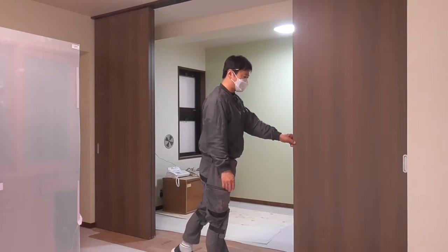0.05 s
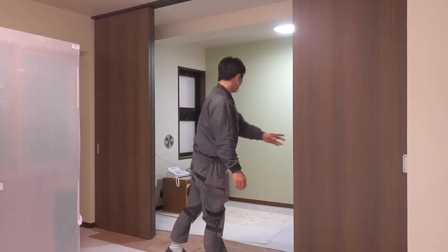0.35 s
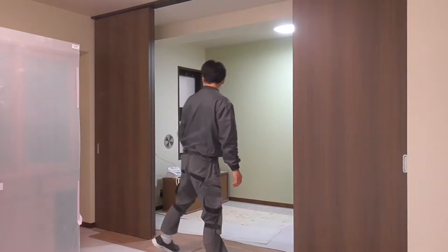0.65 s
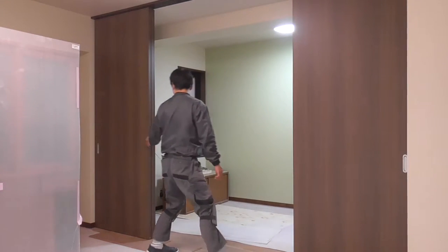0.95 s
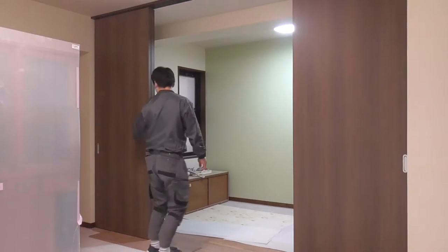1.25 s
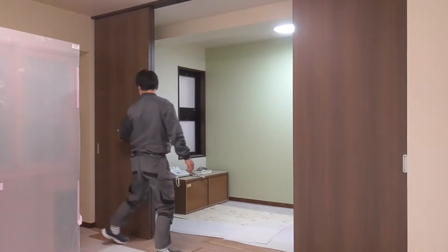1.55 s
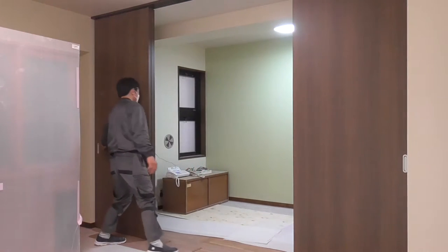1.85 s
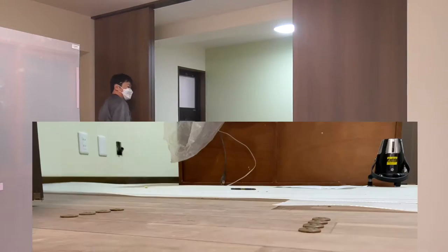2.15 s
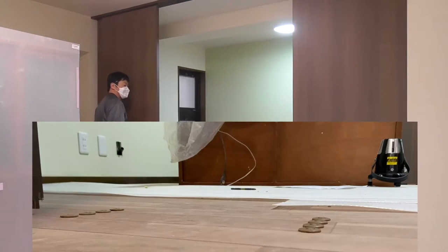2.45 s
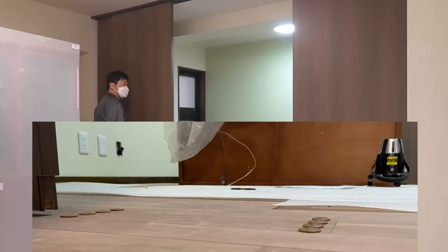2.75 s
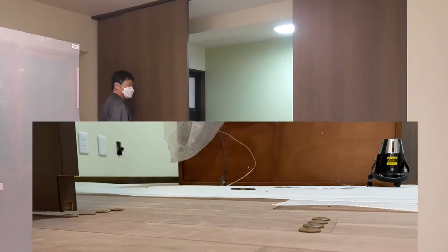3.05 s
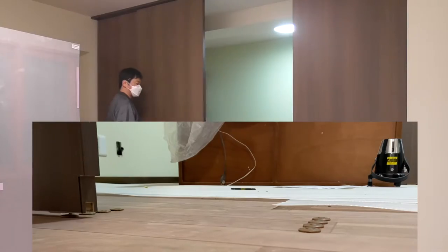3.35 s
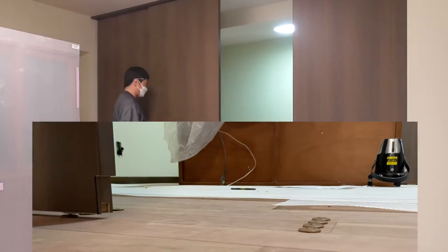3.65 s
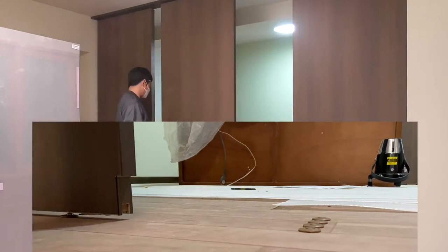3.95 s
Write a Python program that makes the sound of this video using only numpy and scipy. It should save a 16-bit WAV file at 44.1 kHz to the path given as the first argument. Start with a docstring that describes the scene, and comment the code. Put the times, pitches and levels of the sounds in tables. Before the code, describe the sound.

In a bare, echoing room, linked wooden doors slide with a hollow rumble, thudding and rattling as metal catches clack. Before they move, the microphone picks up a fading bump and a few soft, scuffing footsteps.

```python
"""Linked wooden sliding doors in a bare, echoing room. First a bump dies away in a panel's modes.
Then shoes step, scuff and squeak over the floor. At 2.2 s a panel is knocked loose and rolls along
its overhead rail, rumbling and droning as the wheels shake it. From then on, as each further panel
is picked up, the wood thuds and rattles and a metal catch clacks, while dull room noise swells."""
import sys
import numpy as np
from scipy import signal
from scipy.fft import rfft, irfft, next_fast_len
from scipy.io import wavfile
from scipy.ndimage import uniform_filter1d, map_coordinates

SR = 44100
rng = np.random.default_rng(int(sys.argv[2]) if len(sys.argv) > 2 else 0)


def digitize_waveform(pressure):
    """Quantize a signal to 16-bit integers and store it at the path in sys.argv[1].

    Rows of a 2-D input are taken as channels; values are limited to [-1, 1].
    """
    field = np.atleast_2d(pressure).T
    bounded = np.clip(field, -1, 1)
    quanta = np.round(bounded * 32767).astype(np.int16)
    wavfile.write(sys.argv[1], SR, quanta)


N = 176400
T = np.arange(N) / SR
M = next_fast_len(N + SR)  # padded transform length
HZ = np.fft.rfftfreq(M, 1 / SR)


def rolling(fine, join_s=3.28, trim_db=-4):
    """Forced vibration: wheels on the rail shake hollow panels, whose drone shifts as another joins."""
    # (time [s], relative rumble level [dB], wheel hiss level [dB], relative drone level [dB])
    levels = [(2.2, -80, -69, -78), (2.35, -28, -52.5, -66), (2.55, -30, -44.5, -43),
              (2.7, -30, -41.5, -36), (2.85, -30.5, -41, -31), (3.0, -32, -41, -30.5),
              (3.19, -30, -42, -34), (3.31, -28.5, -41.5, -49), (3.45, -29.5, -39, -26.5),
              (3.6, -27, -45, -33.5), (3.75, -31, -45, -33.5), (3.9, -32.5, -47, -41),
              (4.0, -26.5, -37, -49)]
    # spectra of the rumble and the wheel hiss (frequency [Hz], level [dB])
    rumble_spectrum = [(30, -35), (60, -21), (115, -16.5), (160, -9.5), (250, -8), (300, -3.5), (370, -9.5),
                       (500, -9), (740, -13.5), (1000, -15.5), (1250, -16), (1550, -20), (1750, -32.5),
                       (2500, -32)]
    wheel_spectrum = [(700, -14), (1500, 5.5), (2200, 3), (3800, 2), (5500, -8), (8000, -6.5),
                      (11500, -9.5), (15000, -29)]
    # panel resonances (frequency [Hz], half-width [Hz], weight before the join [dB], weight after [dB])
    modes = [(80.7, 4.3, -4, -11), (172.2, 6.9, 1.5, -3), (205.7, 7.3, -3.5, 4.5), (304, 3.5, -23, -4),
             (430, 3.6, -39, -31), (493, 1.3, -8, 1), (615, 12, -0.5, -28), (726, 6.9, -6.5, -4.5),
             (1070, 53, -19, -19), (1521, 34, -4.5, -15)]
    rumble_db, hiss_db, drone_db = curves(levels)
    before, after = (diffuse(sum(amp(db[k]) / np.sqrt(width) * resonance(hz, width)
                                 for hz, width, *db in modes)) for k in range(2))
    joined = np.clip((T - join_s) / 0.052, 0, 1)
    drone = amp(drone_db + trim_db) * (np.sqrt(1 - joined) * before + np.sqrt(joined) * after)
    force = amp(rumble_db + trim_db) * flutter(depth_db=1.7, samples=1500)
    rumble = force * bumps(shape(rumble_spectrum) * fine, per_s=610)
    hiss = amp(hiss_db) * bumps(shape(wheel_spectrum) * ripple(spacing_hz=30.05, depth_db=2), per_s=2900)
    return (rumble + drone + hiss) * (T > levels[0][0])


def knocks(fine, rise_per_t60=0.029):
    """Modal decay: a bumped panel's damped modes knock, light ones ring on; soft bumps lack treble."""
    # (time [s], level [dB], bass boost [dB], low-pass corner [Hz], echo gain [dB], ring gain [dB])
    impacts = [(-.03, -15.5, 13, 600, 2, -38), (2.203, -47, -16, 6000, -12, -24),
               (2.2085, -15.5, -8.5, 12100, 2.5, -18), (2.231, -28.5, -5.5, 1420, 11.5, -24),
               (2.281, -26, -4, 1790, 6.5, -13), (2.66, -36, -6, 3000, 13, -36),
               (2.83, -30.5, -2.5, 2960, -1.5, -31)]
    # panel modes (frequency [Hz], relative level [dB], T60 [s])
    modes = [(319, 1.5, 2.46), (387, 9, 0.057), (417, 1, .9), (484, -5, 1.2), (520, 10, 0.63),
             (615, -11, 1.2), (679, -1, 1.9), (712, 24.5, 0.044), (743, -5, 2), (1083, 15.5, 0.057)]
    out = np.zeros((2, N))
    for s, db, bass_db, soft_hz, room_db, ring_db in impacts:
        lowpass = lambda hz: 1 / np.sqrt(1 + (hz / soft_hz) ** 2)
        ring = np.zeros((2, N))
        for hz, mode_db, t60 in modes:
            envelope = amp(mode_db - 60 * T / t60) * (1 - np.exp(-T / (rise_per_t60 * t60)))
            ring += lowpass(hz) * envelope * np.sin(2 * np.pi * hz * T + rng.normal(0, 0.42, (2, 1)))
        knock = strike(wood(bass_db) * fine * lowpass(HZ), t60=0.05, chatter=0.95, room_db=room_db)
        add(out, s, amp(db) * (knock + amp(ring_db) * ring))
    return out


def thuds(rise_s=0.013, t60=0.064):
    """Damped oscillation: a panel's mass takes up the pull and swings on its hangers."""
    # (time [s], level [dB], frequency [Hz], echo gain [dB])
    jerks = [(.002, -25.5, 159.6, -1), (.02, -37.5, 69, 4), (2.641, -27.5, 129, -5.5),
             (3.045, -32.5, 169, -1), (3.104, -29, 170, -1), (3.256, -24, 158, -1),
             (3.309, -25.5, 160.4, 1), (3.513, -31, 58, -14), (3.565, -26.5, 92, -21),
             (3.58, -31, 54.3, -18), (3.623, -32, 88, -18), (3.914, -26, 181, -21),
             (3.944, -16.5, 176.3, -5)]
    out, t = np.zeros((2, N)), T[:SR // 2]
    for s, db, hz, room_db in jerks:
        swing = np.sin(2 * np.pi * hz * t) * (1 - np.exp(-(t / rise_s) ** 2)) * amp(-60 * t / t60)
        echo = signal.fftconvolve(swing[None], reverberation(), axes=1)
        add(out, s, amp(db) * blow(swing))
        add(out, s, amp(db + room_db) * blow(echo))
    return out


def catches():
    """Hard impact: the brief contact of a metal catch excites high frequencies."""
    # (time [s], level [dB], echo gain [dB], tilt [dB/octave], left-right [dB], ring [Hz], boost [dB])
    contacts = [(2.662, -48, 18.5, -2, -12, 4300, -8), (2.6826, -26.5, 6, 9, -3, 3300, 7),
                (3.2167, -25.5, -1, -2.5, 8.5, 3600, 6), (3.222, -33.5, 0.5, -9, 11, 1450, 2),
                (3.235, -39, 11.5, 2, 7, 1250, 18), (3.2800, -25, 3.5, 7, 0, 6960, -1),
                (3.519, -38, 5.5, -11.5, 9, 2840, 12), (3.936, -45, 16.5, -1.5, -3, 4360, -10),
                (3.9627, -25.5, 2.5, 9.5, -4, 8700, 0), (3.9667, -30, 0, 8, 3, 10000, -2)]
    # (frequency [Hz], level [dB])
    spectrum = [(300, -20), (1200, -9.5), (2300, -6.5), (3300, 2), (4400, 4.5), (5600, 1.5), (7500, -1),
                (10500, -5), (12500, -10), (14500, -19), (15700, -26)]
    return clicks(contacts, spectrum, chatter=0.93)


def rattles(fine):
    """Repeated impact: each jerk sets a hollow panel chattering against its guides."""
    # (peak time [s], rise [s], fall [s], level [dB])
    jerks = [(2.7, 0.052, 0.077, -31.5), (2.85, 0.1, .13, -39.5), (3.3, 0.06, 0.11, -29.5),
             (3.4, 0.028, 0.099, -36.5), (3.97, 0.038, .1, -30.5)]
    # (frequency [Hz], level [dB])
    spectrum = [(300, -13), (520, -7), (620, 0.5), (790, 3.5), (950, -1), (1200, -2), (1550, -23),
                (2200, -20)]
    force = sum(swell(*row) for row in jerks)
    return force * flutter(depth_db=3, samples=600) * bumps(shape(spectrum) * fine, per_s=260)


def walking(soft_hz=1500):
    """Soft impact and sliding friction: shoes fall dully on the boards and scuff with a grainy noise."""
    # (time [s], level [dB], bass boost [dB], echo gain [dB])
    steps = [(0.699, -51, -8, 12), (.718, -50.5, -5, 13), (.745, -52.5, -18, 12.5), (1.185, -47, -5, 0.5),
             (1.221, -43, 34, -2), (1.25, -38.5, 23, -13), (1.43, -72, -29, 26), (1.609, -51.5, 11, 10),
             (1.687, -44, 19, 0.5), (2.039, -62, 6, 16)]
    # (peak time [s], rise [s], fall [s], level [dB])
    scuffs = [(.852, 0.017, 0.023, -49), (.955, 0.035, 0.024, -51.5), (1.0, 0.022, 0.066, -49.5),
              (1.14, 0.028, 0.016, -51.5), (1.229, 0.045, 0.065, -39), (1.385, 0.025, 0.077, -43.5),
              (1.61, 0.066, 0.36, -53.5), (1.888, 0.037, 0.085, -39.5)]
    # (frequency [Hz], level [dB])
    scuff_spectrum = [(300, -3.5), (1000, -0.5), (2000, -8.5), (3000, -5), (4400, -1), (6000, -3),
                      (9000, 3.5), (12000, 0), (14500, -6), (15700, -14)]
    out = np.zeros((2, N))
    for s, db, bass_db, room_db in steps:
        boards = wood(bass_db) / (1 + (HZ / soft_hz) ** 4)
        add(out, s, amp(db) * strike(boards, t60=0.12, chatter=2.8, room_db=room_db))
    stroke = sum(swell(*row) for row in scuffs)
    return out + stroke * flutter(depth_db=1.5, samples=120) * diffuse(shape(scuff_spectrum))


def ticks():
    """Impulsive excitation: small hard contacts tick and snap underfoot."""
    # (time [s], level [dB], echo gain [dB], tilt [dB/octave], left-right [dB], ring [Hz], boost [dB])
    contacts = [(.589, -53, 2, 6, -7, 9400, 4), (.843, -50.5, 8, -3.5, -4, 1930, 11),
                (1.2513, -24.5, -6, 1.5, -4.5, 4390, -7), (1.2538, -38, 7, 4.5, 11, 4520, 12),
                (1.736, -49, 9, -1.5, -1, 5500, 4)]
    # (frequency [Hz], level [dB])
    spectrum = [(300, -15), (1000, -7), (2300, -13), (3500, -1.5), (4500, -2), (5800, -6.5), (8000, 0.5),
                (11000, 0.5), (13000, -8), (15700, -16)]
    return clicks(contacts, spectrum, chatter=0.48)


def squeaks():
    """Stick-slip friction: a sole sounds for a moment in one narrow band."""
    # (peak time [s], rise [s], fall [s], level [dB], frequency [Hz], half-width [Hz])
    slips = [(1.0, .015, .025, -51, 4470, 900), (1.256, 0.0033, 0.036, -38, 4500, 450),
             (1.737, 0.002, 0.0046, -40, 8100, 550), (1.756, 0.018, .025, -50.5, 3480, 700)]
    return sum(swell(*envelope) * diffuse(1 / (1 + ((HZ - hz) / width) ** 4))
               for *envelope, hz, width in slips)


def background(ring_db=-8.5, hiss_db=-61.5):
    """Ambient noise: a dull, swelling diffuse field with a few resonances, and a faint steady hiss."""
    # (time [s], level [dB])
    noise_level = [(0, -77), (.65, -53), (1.1, -52.5), (1.4, -51), (2.1, -50.5), (4, -38.5)]
    # (frequency [Hz], level [dB])
    noise_spectrum = [(25, -15), (60, -9), (100, -1), (160, 5.5), (260, -5), (450, -2.5), (650, -4.5),
                      (1000, -6), (1400, -8.5), (2000, -21.5), (5000, -20)]
    hiss_spectrum = [(1000, 8), (3000, -1), (6000, 1), (9000, 6), (12000, 4), (14500, 2.5), (15700, -23)]
    # (frequency [Hz], half-width [Hz], relative level [dB])
    resonances = [(151.6, 3.5, -6), (337.6, 8.4, -0.5), (615.4, 5.5, 1.5), (668, 6.8, 0.5)]
    level_db, = curves(noise_level)
    rings = diffuse(sum(amp(db) * resonance(hz, width) for hz, width, db in resonances))
    noise = diffuse(shape(noise_spectrum) * ripple(spacing_hz=16, depth_db=2.5))
    hiss = amp(hiss_db) * diffuse(shape(hiss_spectrum))
    return amp(level_db) * unit(noise + amp(ring_db) * rings) + hiss


def wood(bass_db, corner_hz=260):
    """Frequency response of struck wood; soft, heavy contacts have more bass."""
    # (frequency [Hz], level [dB])
    spectrum = [(30, -56), (65, -22), (95, -9.5), (150, -8), (200, 0), (320, -3), (430, -2), (520, -1.5),
                (630, -1), (730, -1.5), (850, -6), (1100, -10), (1450, -19), (1800, -26), (3200, -30.5),
                (3950, -22), (4700, -32), (10000, -36.5), (15000, -47)]
    return shape(spectrum) * amp(bass_db / (1 + (HZ / corner_hz) ** 2))


def clicks(contacts, spectrum, chatter):
    """Resonant filtering gives each hard contact its own brightness and ring."""
    out = np.zeros((2, N))
    for s, db, room_db, tilt_db, pan_db, ring_hz, ring_db in contacts:
        tilt = tilt_db * np.log2(np.maximum(HZ, 1000) / 1000)
        ring = ring_db * resonance(ring_hz, 0.42 * ring_hz)
        gain = shape(spectrum) * ripple(spacing_hz=69.4, depth_db=1.0) * amp(tilt + ring)
        add(out, s, amp(db) * strike(gain, t60=0.012, chatter=chatter, room_db=room_db, pan_db=pan_db))
    return out


def strike(gain, t60, chatter, room_db, pan_db=0, contact_s=0.00054):
    """Source and filter: a contact, its brief chatter and the room's echo share one response."""
    colour, t = minimum_phase(gain), T[:SR // 2]
    rattle = blow(rng.standard_normal(len(t)) * amp(-60 * t / t60))
    contact = blow(rng.standard_normal(len(t)) * np.exp(-t / contact_s))
    direct = blow(filtered(contact + chatter * rattle, colour)) * amp([[pan_db / 2], [-pan_db / 2]])
    return direct + amp(room_db) * blow(filtered(reverberation(), colour))


def bumps(gain, per_s, room_db=20.5):
    """Shot noise: tiny random impacts ring a body, under diffuse room sound of the same colour."""
    impulses = rng.standard_normal(N) * (rng.random(N) < per_s / SR)
    return unit(unit(filtered(impulses, gain)) + amp(room_db) * diffuse(gain))


def reverberation(rise_s=0.0032):
    """A fresh room impulse response: each frequency decays exponentially at its own rate."""
    # (frequency [Hz], T60 [s])
    decay_times = [(60, 0.48), (200, 0.81), (600, 0.93), (1500, 1), (4000, 0.78), (8000, 0.47),
                   (14000, .42)]
    hz, t, bands = signal.stft(diffuse(1)[:, :3 * SR // 2], SR, nperseg=256)
    decay = amp(-60 * t / along(decay_times, hz)[:, None])
    echo = signal.istft(bands * decay, SR, nperseg=256)[1]
    return echo * (1 - np.exp(-T[:echo.shape[1]] / rise_s))


def diffuse(gain):
    """Diffuse field: coloured noise from all round, most alike left and right in the bass."""
    # (frequency [Hz], left-right correlation [0-1])
    correlation = [(60, 0.9), (140, 1), (260, 0.81), (500, 0.7), (1000, 0.42), (2500, 0.55), (6000, 0.29),
                   (12000, 0.023)]
    angle = np.arccos(np.clip(along(correlation, HZ), -1, 1)) / 2
    mid, side = filtered(rng.standard_normal((2, N)), gain * np.array([np.cos(angle), np.sin(angle)]))
    return unit(np.array([mid + side, mid - side]))


def resonance(hz, half_width):
    """Lorentzian peak of height 1."""
    return 1 / (1 + ((HZ - hz) / half_width) ** 2)


def ripple(spacing_hz, depth_db):
    """Modal overlap: many close resonances, as a random gain over frequency."""
    knots = rng.standard_normal(8192)
    return amp(depth_db * map_coordinates(knots, [HZ / spacing_hz], mode="wrap"))


def swell(s, rise, fall, db):
    """Gaussian rise to a peak at time s, then exponential decay."""
    return amp(db) * np.exp(-np.where(T < s, ((T - s) / rise) ** 2, (T - s) / fall))


def flutter(depth_db, samples):
    """Random amplitude modulation, smoothed over this many samples."""
    return unit(amp(depth_db * unit(uniform_filter1d(rng.standard_normal(N), size=samples))))


def shape(points):
    """Spectral envelope as a gain, falling 13 dB per octave beyond its ends."""
    octaves_below = np.maximum(np.log2(points[0][0] / (HZ + 1)), 0)
    octaves_above = np.maximum(np.log2((HZ + 1) / points[-1][0]), 0)
    return amp(along(points, HZ) - 13 * (octaves_below + octaves_above))


def minimum_phase(gain):
    """Causality: the response with this gain that never sounds early."""
    cepstrum = irfft(np.log(np.maximum(gain, 1e-6)), M)
    cepstrum[1:M // 2] *= 2
    cepstrum[M // 2 + 1:] = 0
    return np.exp(rfft(cepstrum))


def filtered(x, gain):
    """Linear filtering of x by a frequency response."""
    return irfft(rfft(x, M) * gain, M)[..., :N]


def along(points, hz):
    """Interpolation of (frequency [Hz], value) points on a log axis."""
    f, values = np.transpose(points)
    return np.interp(np.log(hz + 1), np.log(f + 1), values)


def curves(rows):
    """Interpolation to every sample of each column after the time."""
    s, *columns = np.transpose(rows)
    return [np.interp(T, s, column) for column in columns]


def add(out, s, x):
    """Superposition of x on out from time s."""
    i = round(s * SR)
    x = x[..., max(-i, 0):N - i]
    out[:, max(i, 0):max(i, 0) + x.shape[-1]] += x


def amp(db):
    """Decibels to amplitude ratio."""
    return 10 ** (np.asarray(db) / 20)


def unit(x):
    """Normalisation to rms 1."""
    return x / np.sqrt(np.mean(x ** 2) + 1e-20)


def blow(x):
    """Normalisation to the energy of 10 ms at rms 1."""
    return unit(x) * np.sqrt(.01 * SR / x.shape[-1])


def scene():
    """Superposition of doors, feet and room."""
    fine = ripple(spacing_hz=16, depth_db=1.5)  # the panels' close resonances
    hard_contacts = catches() + ticks()
    panels = knocks(fine) + thuds() + rolling(fine) + rattles(fine)
    return hard_contacts + panels + walking() + squeaks() + background()


def record(dry, top_hz=15700):
    """Band-limited stereo pickup; the right microphone is a little brighter."""
    # (frequency [Hz], left-right [dB])
    balance = [(60, 3.0), (200, -1.5), (600, 0.0), (4000, 0.2), (8000, 0.1), (12000, -3.0)]
    lean_db = along(balance, HZ)
    fade_in = np.minimum(T / .004, 1)
    return filtered(dry * fade_in, amp(np.array([lean_db, -lean_db]) / 2) * (HZ < top_hz))


dry = scene()
out = record(dry)
digitize_waveform(out)
```